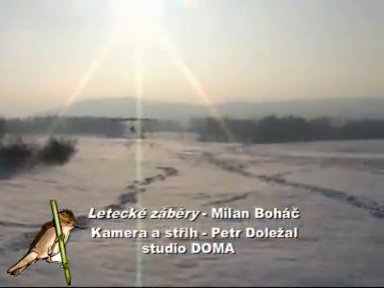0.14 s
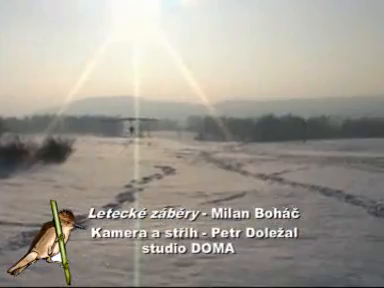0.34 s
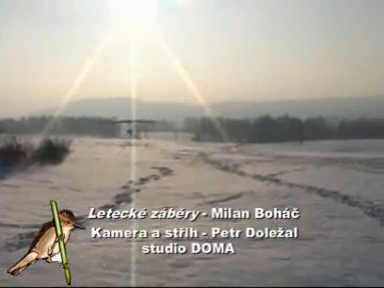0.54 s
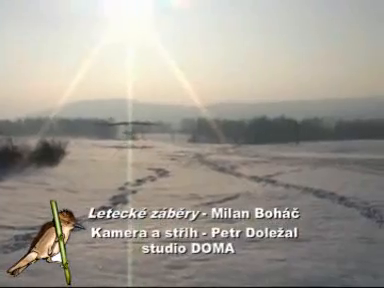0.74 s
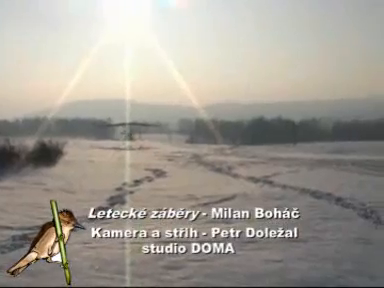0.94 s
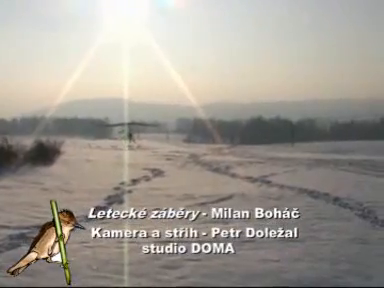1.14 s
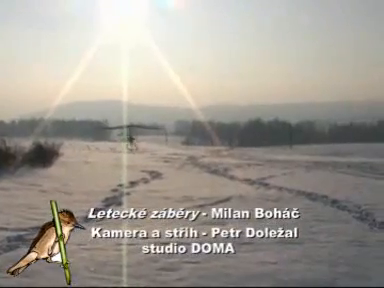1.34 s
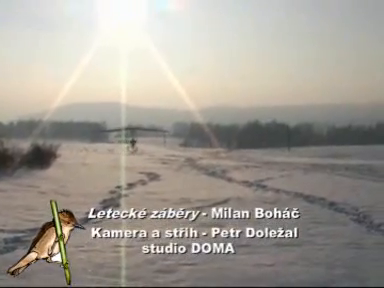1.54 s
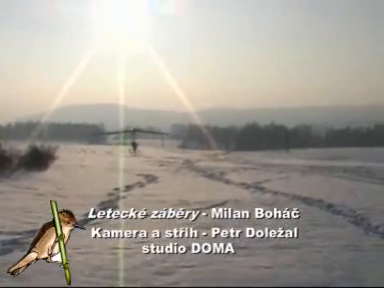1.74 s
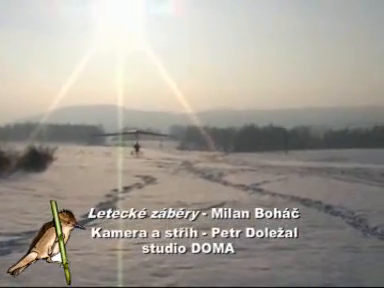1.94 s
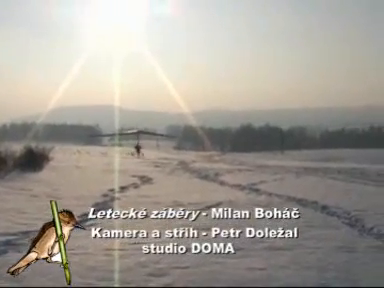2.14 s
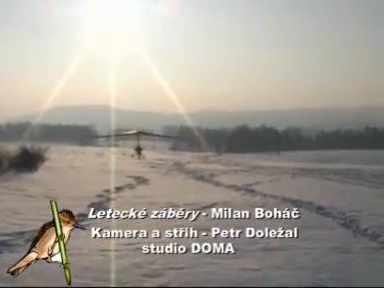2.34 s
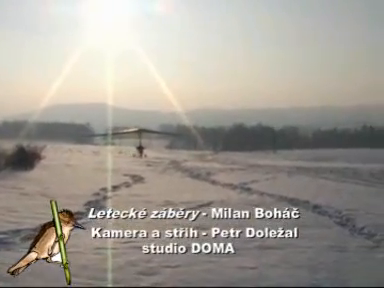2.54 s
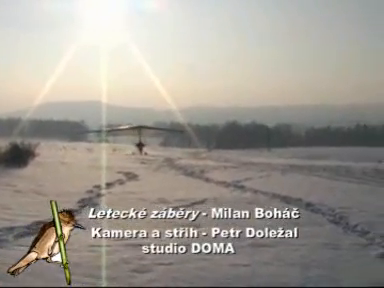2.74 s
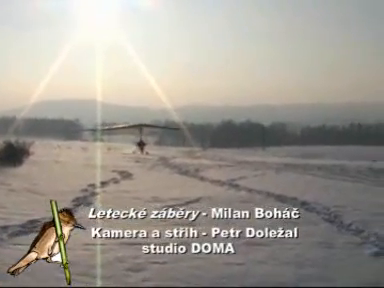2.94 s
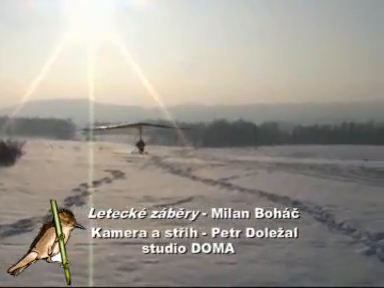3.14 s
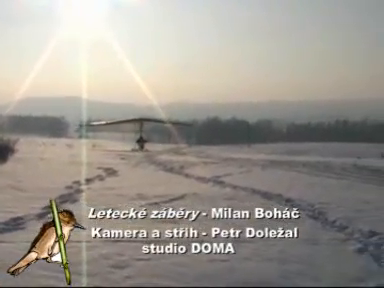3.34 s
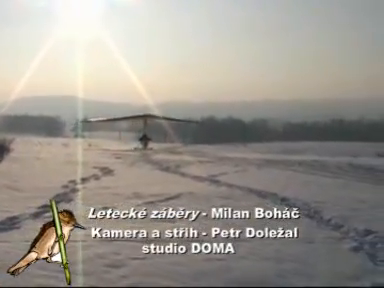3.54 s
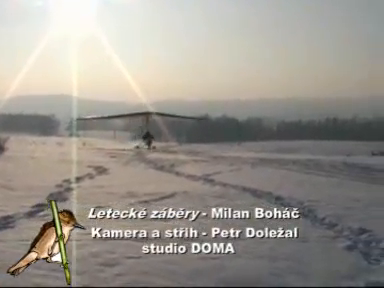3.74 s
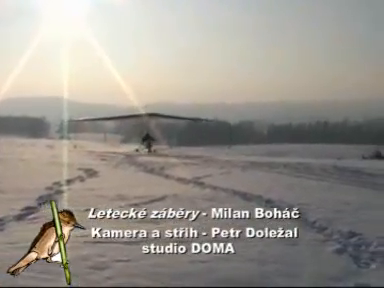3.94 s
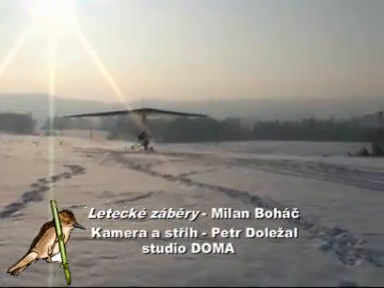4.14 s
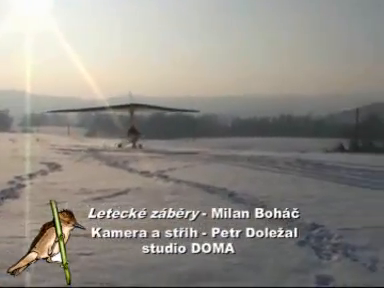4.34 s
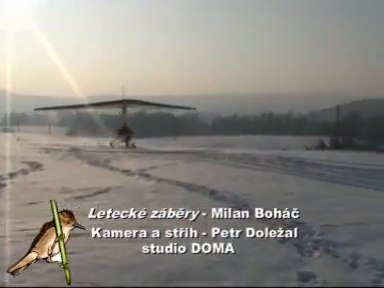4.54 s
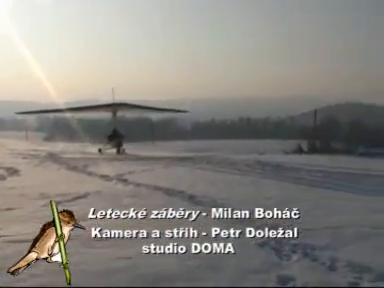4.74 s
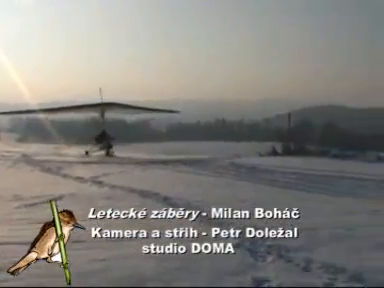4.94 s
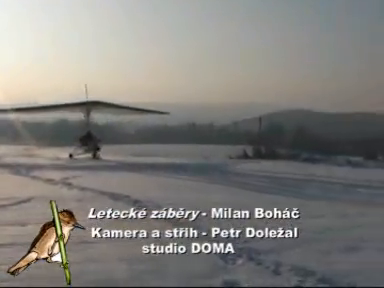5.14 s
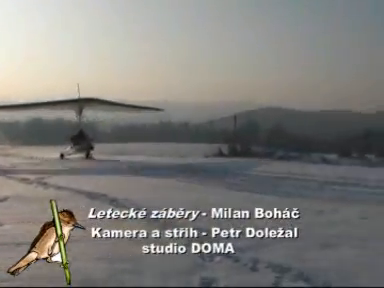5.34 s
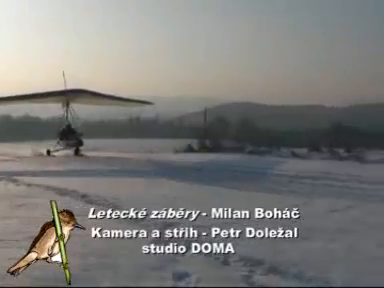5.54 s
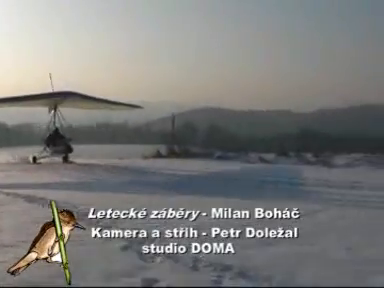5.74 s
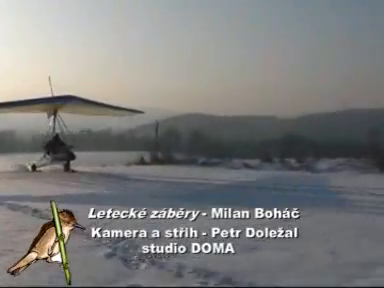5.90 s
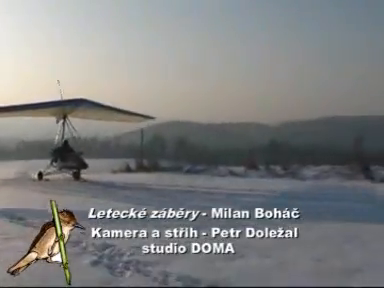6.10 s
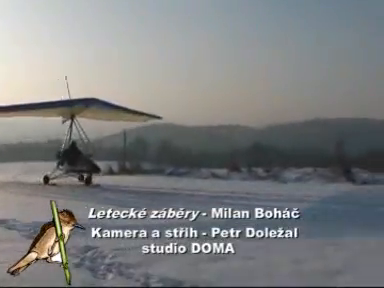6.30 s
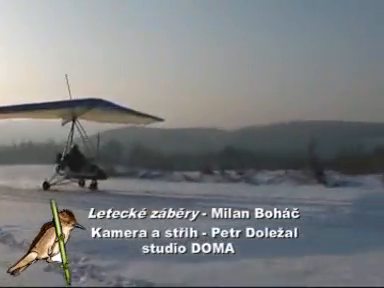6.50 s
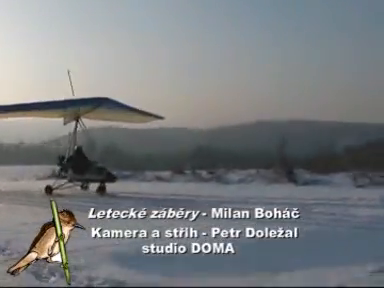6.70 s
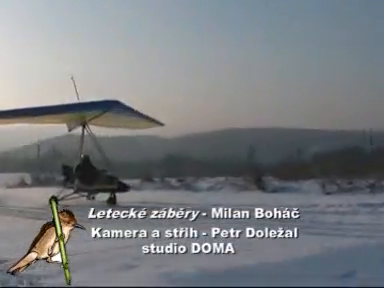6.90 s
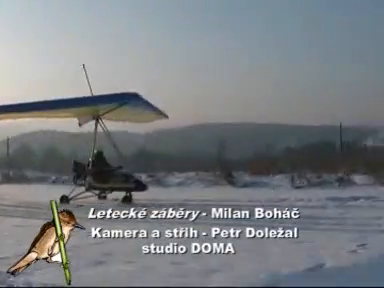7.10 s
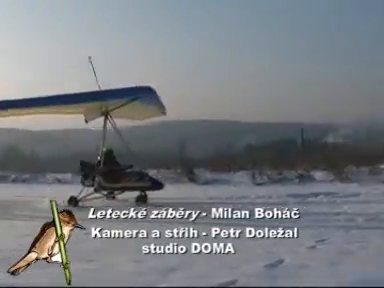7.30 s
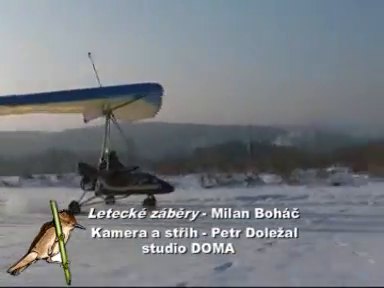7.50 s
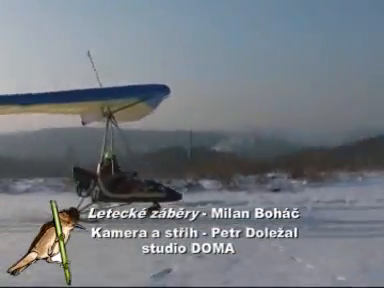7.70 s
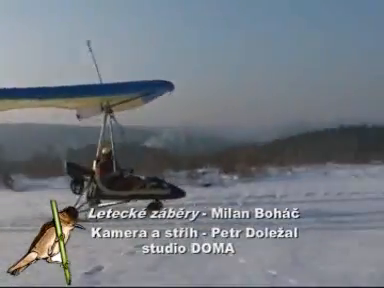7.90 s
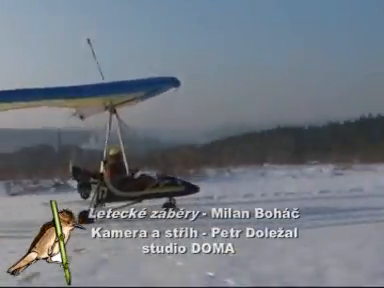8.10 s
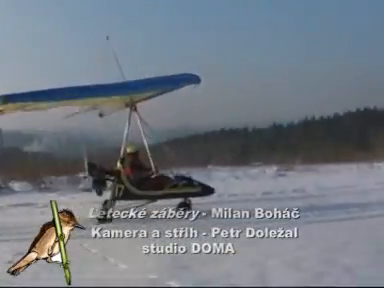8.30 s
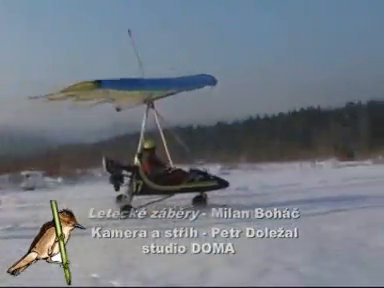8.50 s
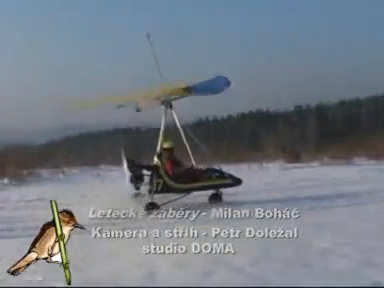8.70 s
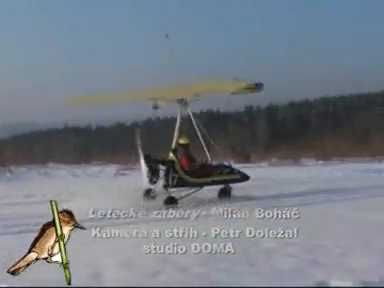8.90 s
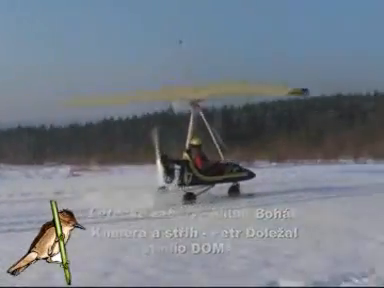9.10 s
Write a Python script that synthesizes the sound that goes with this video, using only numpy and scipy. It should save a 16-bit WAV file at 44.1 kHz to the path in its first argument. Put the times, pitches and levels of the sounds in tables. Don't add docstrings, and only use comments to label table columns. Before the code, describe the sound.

Faint engine putter and soft propeller chop sink in pitch while a light aircraft lands and rolls closer on snow. Low wheel rumble and short crunchy jolts precede a sudden throttle surge. The roar rises, hard blade slaps turn into a rapid buzz, and snowy air hisses as it taxis past. A breeze and faint camera hum lie beneath.

```python
import sys
import numpy as np
from scipy import signal
from scipy.fft import irfft
from scipy.io import wavfile
from scipy.ndimage import uniform_filter1d

SR = 44100
rng = np.random.default_rng(int(sys.argv[2]) if len(sys.argv) > 2 else 0)


def ratio_of_db(decibels):
    return 10 ** (np.asarray(decibels, float) / 20)


def to_wav(sig):
    pcm = np.clip(np.atleast_2d(sig), -1, 1) * 32767
    pcm = np.round(pcm).astype(np.int16)
    wavfile.write(sys.argv[1], SR, pcm.T)


N = 403515
T = np.arange(N) / SR

THROTTLE_S, TURN_S = 5.586, 6.8
BEHIND_S, ABEAM_S = 7.95, 8.51
FIRST_CUT_TURNS = .23


def evened(x):
    return x / np.sqrt(np.mean(x ** 2) + 1e-20)


def levelled(x):
    return x / np.sqrt(uniform_filter1d(x ** 2, size=12000) + 1e-9)


def curves(rows):
    s, *columns = np.transpose(rows)
    return [np.interp(T, s, c) for c in columns]


def ramp(start_s, length_s):
    return np.sin(np.pi / 2 * np.clip((T - start_s) / length_s, 0, 1)) ** 2


def bump(centre_s, width_s):
    return np.exp(-.5 * ((T - centre_s) / width_s) ** 2)


def drift(top_hz):
    b, a = signal.butter(1, top_hz / SR * 2)
    once = signal.lfilter(b, a, rng.standard_normal(N))
    return evened(signal.lfilter(b, a, once))


def colour(x, points, even=True):
    hz, db = np.transpose(points)
    full_hz = abs(np.fft.fftfreq(8192, 1 / SR))
    full_db = np.interp(np.log(full_hz + 1), np.log(hz + 1), db, left=-90, right=-90)
    log_gain = np.log(ratio_of_db(full_db))
    taps = np.fft.ifft(np.exp(np.conj(signal.hilbert(log_gain)))).real[:4096]
    if even:
        taps = taps / np.linalg.norm(taps)
    return signal.oaconvolve(x, taps)[:N]


# (time [s], blade passes [1/s])
SPEED = [(0.0, 52.66), (0.35, 49.08), (0.7, 46.31), (1.4, 43.55), (2.45, 42.11), (3.5, 40.52), (4.2, 39.21),
         (4.9, 38.08), (5.45, 37.24), (5.6, 38.61), (5.9, 49.36), (6.15, 56.24), (6.45, 61.56),
         (6.85, 65.68), (7.3, 68.67), (7.9, 71.72), (8.5, 73.38), (9.15, 74.18)]
# (time [s], distance [m])
DISTANCE = [
    (0, 142),
    (1.8, 99),
    (2.5, 114),
    (4, 48.6),
    (5.1, 30.3),
    (5.5, 24.3),
    (7, 14.9),
    (8.6, 12.6),
    (9.15, 14.7),
]


def flight():
    closest_m, idle_hz, full_hz = 12, 37.5, 74.2
    surge_s, surge_rise_s, surge_fall_s = 6.194, 0.41, 0.38
    surge = np.where(T < surge_s, bump(surge_s, surge_rise_s), np.exp(-((T - surge_s) / surge_fall_s)))
    return dict(
        loss_db=20 * np.log10(closest_m / curves(DISTANCE)[0]),
        speed=(curves(SPEED)[0] - idle_hz) / (full_hz - idle_hz),
        flare=np.exp(-T / 1),
        throttle=ramp(THROTTLE_S, 0.59),
        surge=surge * ramp(THROTTLE_S - .1, 0.21),
        abeam=bump(ABEAM_S, 0.39),
        behind=ramp(BEHIND_S, 0.23))


FLIGHT = flight()

# (level when closest [dB], share of distance loss [dB/dB], then gain at full
# speed, flare, throttle, surge, abeam, behind [dB])
LEVELS = dict(tone1=(-58, 1.7, 23.5, .1, 0.8, 8, 4, 1.3), tone2=(-40, 0.36, 1.5, -9, 0.45, 7.5, 8, 1.5),
          tone3=(-30, 1.95, -0.4, 6, -14, 10.5, 7.5, 2.5), firing=(-55, 0.5, -2, .1, 13, 5, 1.5, 0.5),
          pipe=(-46, 1.4, 0.37, 14, -5.5, 13, 0, 12.5), roar=(-29.5, 0.7359, 0.9, 12.5, 3, 7, -0.2, -0.35),
          slap=(-41.5, 0.85, 4.0, 11, 12.5, 1.6, -1.7, -1), hiss=(-30, 1.0133, -0.77, -2.5, -.5, 7.5, 5, 0))


def level(layer):
    base_db, *gains = LEVELS[layer]
    return base_db + np.dot(gains, list(FLIGHT.values()))


def tones(turns):
    third_db = level('tone3')
    levels_db = [level('tone1'), level('tone2'), third_db, np.minimum(third_db - 12, -57)]
    out = np.zeros(N)
    for k, db in enumerate(levels_db, 1):
        phase = 2 * np.pi * k * (turns - .5) + 0.064 * drift(24.0)
        out += np.sqrt(2) * ratio_of_db(db + 0.59 * drift(14.0)) * np.cos(phase)
    return out


def chop_share():
    return .25 + .18 * ramp(THROTTLE_S, 1.1) - .15 * bump(ABEAM_S - .15, .25)


def struts():
    head_on, side_on, closed = .3, .24, .095
    gap = side_on + (head_on - side_on) * np.exp(-np.maximum(T - TURN_S, 0) / .55)
    gap = np.maximum(gap - .22 * np.maximum(T - BEHIND_S - .1, 0), closed)
    first_db, turned_db, behind_db = 1.5, 5, 4.5
    turned, behind = ramp(TURN_S - .05, 0.11), ramp(BEHIND_S + .15, .2)
    return gap, first_db + (turned_db - first_db) * turned + (behind_db - turned_db) * behind


def gate(turns, place, width):
    return np.exp(-.5 * (((turns - place + .5) % 1 - .5) / width) ** 2)


def wake(turns):
    gap, second_db = struts()
    first = ratio_of_db(-second_db / 6) * gate(turns, FIRST_CUT_TURNS + .05, .05)
    second = ratio_of_db(second_db / 6) * gate(turns, FIRST_CUT_TURNS + gap + .02, .04)
    return first + second + .55 * gate(turns, FIRST_CUT_TURNS + gap / 2 + .05, .09)


# (frequency [Hz], density [dB/Hz])
DULL_ROAR = [(150, -18), (250, -14.5), (380, -2.5), (520, -2), (620, -3), (1000, 1), (1500, -2.5),
             (2100, -8), (2800, -14), (4000, -28.5), (6000, -60)]
SHARP_ROAR = [(150, -27), (250, -4.5), (330, -14), (470, -0.5), (620, -10.5), (1070, -1), (1350, 0),
              (1700, 1.5), (2200, -1.5), (3000, -14), (5000, -15)]
POWER_ROAR = [(200, -21), (300, -21.5), (400, -9.5), (520, -8), (700, -5), (1000, -0.5), (1400, -2.5),
              (1900, -4.5), (2500, -9), (3300, -20), (5000, -23)]


def roar(turns):
    chop = np.clip(chop_share(), 0, 1)
    dull = np.clip(0.5 + 0.5 * FLIGHT['flare'], 0, 1)
    power = ramp(THROTTLE_S, 0.98)
    burst = evened(wake(turns) * ratio_of_db(.6 * drift(40.0)))
    churn = ratio_of_db(0.73 * drift(26.0))
    drive = (chop * burst + (1 - chop) * churn) * rng.standard_normal(N)
    idle = dull * colour(drive, DULL_ROAR) + (1 - dull) * colour(drive, SHARP_ROAR)
    return ratio_of_db(level('roar')) * levelled((1 - power) * idle + power * colour(drive, POWER_ROAR))


def clicks(turns, jitter_s, spread_db):
    passes = np.arange(1, int(turns[-1]))
    chance = rng.standard_normal((len(passes), 2))
    at = np.interp(passes, turns, np.arange(N)) + jitter_s * SR * chance[:, 0]
    size = ratio_of_db(spread_db * chance[:, 1])
    out = np.zeros(N + 2)
    out[at.astype(int)] += size * (1 - at % 1)
    out[at.astype(int) + 1] += size * (at % 1)
    return out[:N]


def chirped(x, late_s):
    phase = 2 * np.pi * np.cumsum(late_s) * SR / 1024
    return signal.oaconvolve(x, irfft(np.exp(-1j * phase))[:512])[:N]


# (frequency [Hz], level [dB])
SOFT_SLAP = [(250, -40), (390, -20), (450, -7), (540, 0), (650, -2), (800, -5), (1000, -7), (1500, -10),
             (2500, -19), (4000, -35)]
HARD_SLAP = [(250, -36), (320, -22), (370, -13), (600, -9), (800, -2), (1000, 0), (1300, -1), (1650, -2),
             (2100, -7), (3000, -15), (5000, -28)]


def slaps(turns):
    flip_s, flipping_s = 8.05, .35
    level_db = level('slap') - 3.5 * bump(flip_s + flipping_s / 2, flipping_s / 3)
    gap, second_db = struts()
    soft = np.exp(-np.maximum(T - 6.05, 0) / .45) + .4 * ramp(BEHIND_S + .15, .2)
    first = clicks(turns - FIRST_CUT_TURNS, .00004, 1.0)
    second = ratio_of_db(second_db) * clicks(turns - FIRST_CUT_TURNS - gap, .00004, 1.0)
    second *= 1 - 2 * ramp(flip_s, flipping_s)
    hz = np.fft.rfftfreq(1024, 1 / SR)
    late_s = .0003 + .002 * np.clip(1 - hz / 1600, 0, 1)
    drive = chirped(first, late_s) + np.roll(chirped(second, .0026 - late_s), -round(.002 * SR))
    slap = soft * colour(drive, SOFT_SLAP) + (1 - soft) * colour(drive, HARD_SLAP)
    return -ratio_of_db(level_db + 1.5) * levelled(slap)


def engine(turns):
    firings_per_pass = 1.655
    firing_db, pipe_db = level('firing'), level('pipe')
    honk_db = 16.0 * np.exp(-((T - 5.58) / .42) ** 2)
    levels_db = [firing_db + 1 + honk_db / 3, firing_db - 9 + 1.1 * honk_db, firing_db - 7 + .9 * honk_db,
                 pipe_db - honk_db / 4, pipe_db - 5 - honk_db / 4]
    out = np.zeros(N)
    for k, db in enumerate(levels_db, 1):
        phase = 2 * np.pi * k * firings_per_pass * turns + .2 * drift(6.0)
        out += np.sqrt(2) * ratio_of_db(db + 1.5 * drift(6.0)) * np.cos(phase)
    return out


# (frequency [Hz], density [dB/Hz])
FAR_HISS = [(1200, -30), (2200, -7), (3000, -1.5), (3700, -6), (4600, -7.5), (5400, -5), (7080, -9.5),
            (9000, -13.5), (11500, -23), (14000, -32)]
NEAR_HISS = [(1200, -41), (2200, -4.5), (2900, -3.5), (4640, -7), (6030, -4), (7280, -9), (8530, -7),
             (10300, -11.5), (12000, -17.5), (14000, -13)]
# (time [s], gain [dB], half length [s])
PUFFS = [
    (2.24, 2.5, .15),
    (5.254, 0, 0.025),
    (6.24, 1.5, 0.089),
    (6.87, 3, 0.073),
    (7.466, 1.5, 0.039),
    (7.96, 1, 0.075),
    (8.208, 1, 0.032),
    (9.09, 2.5, 0.05),
]


def hiss(turns):
    level_db = level('hiss') + sum(db * bump(s, width_s) for s, db, width_s in PUFFS)
    near = np.clip((level_db + 47.5) / 18, 0, 1)
    chopped = 1 + 1.11 * chop_share() * wake(turns)
    flutter_db = 0.51 * drift(32.0) + 0.76 * drift(65.0)
    air = evened(chopped * ratio_of_db(flutter_db) * rng.standard_normal(N))
    return ratio_of_db(level_db) * ((1 - near) * colour(air, FAR_HISS) + near * colour(air, NEAR_HISS))


# (time [s], jolt [dB])
CRUST_BREAKS = [
    (4.886, 3),
    (4.982, 3),
    (5.113, 3),
    (5.205, 3),
    (5.302, 4),
    (5.464, 3),
]


def crunch():
    s, db = np.transpose(CRUST_BREAKS)
    jolts_db = np.zeros(N)
    jolts_db[(s * SR).astype(int)] = db
    bell = np.exp(-.5 * (np.arange(-1000, 1001) / SR / 0.0041) ** 2)
    return ratio_of_db(signal.oaconvolve(jolts_db, bell, "same"))


# (frequency [Hz], density [dB/Hz])
TYRES = [(20, -43), (45, -42), (80, -0.5), (120, 3.5), (170, 3), (220, -4), (300, -33), (400, -38)]
# (frequency [Hz], level [dB])
SOFT_SNOW = [(20, 0), (140, 1), (210, -10), (400, -14)]
# (time [s], level [dB])
WHEELS = [
    (0, -64.5),
    (2.6, -59.5),
    (3.4, -47),
    (4.3, -41.5),
    (5.5, -40),
    (5.96, -36),
    (6.55, -47),
    (8.2, -50),
    (9.15, -47),
]


def rumble():
    lumps = ratio_of_db(.8 * drift(10.0)) * rng.standard_normal(N)
    wheels = evened(colour(lumps, TYRES))
    near = ramp(4.15, 0.38)
    heard = near * wheels + (1 - near) * colour(wheels, SOFT_SNOW, even=False)
    return ratio_of_db(curves(WHEELS)[0]) * heard


# (frequency [Hz], density [dB/Hz])
WIND = [(15, -20), (30, -11), (50, 1), (70, 8), (110, -18), (200, -40)]


def breeze():
    return ratio_of_db(-58 + 2.0 * drift(1.5)) * evened(colour(rng.standard_normal(N), WIND))


# (frequency [Hz], level [dB])
MOTOR = [(150, -66)]


def hum():
    return sum(np.sqrt(2) * ratio_of_db(db) * np.sin(2 * np.pi * hz * T) for hz, db in MOTOR)


# (frequency [Hz], side minus mid [dB])
LOW_SIDE = [(20, -11), (150, -44), (300, -26.5), (700, -18.5), (1250, -23.5), (1900, -34), (3200, -34.5),
            (6000, -36)]
TOP_SIDE = [(6000, -60), (7500, -24), (8500, -14.5), (11700, -6.5), (12300, -30), (14000, -40)]
# (opens [s], rise [s], closes [s], fall [s])
WIDE_SPELLS = [
    (4.3, 1.4, 5.95, .3),
    (6.35, .25, 8.1, .3),
]


def width(mid, blades):
    scatter = rng.standard_normal(1300) * ratio_of_db(-60 * np.arange(1300) / SR / .04)
    scattered = signal.oaconvolve(mid, scatter / np.linalg.norm(scatter))[:N]
    low_db = -2 - .25 * FLIGHT['loss_db'] - 3 * FLIGHT['behind']
    is_open = sum(ramp(a, rise) - ramp(b, fall) for a, rise, b, fall in WIDE_SPELLS)
    top_db = -21 * (1 - is_open)
    side = ratio_of_db(low_db + 2.0 * drift(12.0)) * colour(scattered, LOW_SIDE, even=False)
    side += ratio_of_db(top_db + 4.3 * drift(11.0)) * colour(scattered, TOP_SIDE, even=False)
    lean_db = .75 * bump(7.1, .9) - .1
    return side + blades * (ratio_of_db(lean_db / 2) - 1)


def scene():
    turns = .18 + np.cumsum(curves(SPEED)[0]) / SR
    heard = turns + .045 * np.maximum(T - TURN_S, 0)
    jolt = crunch()
    blades = roar(heard) * jolt + slaps(heard)
    mid = tones(turns) + blades + engine(turns) + hiss(heard) * jolt + rumble() + breeze() + hum()
    side = width(mid, blades)
    return np.array([mid + side, mid - side])


def top_cut(x):
    return signal.sosfilt(signal.butter(12, 13480, fs=SR, output="sos"), x)


def record(dry):
    hz, t, z = signal.stft(dry, SR, nperseg=1024)
    edge_hz = 13250 + 65 * FLIGHT['loss_db'] - 750 * FLIGHT['flare'] + 300 * FLIGHT['behind']
    top_hz = np.interp(t, T, edge_hz - 1050 * ramp(THROTTLE_S, .7))
    patches = np.kron(rng.standard_normal((103, 200)), np.ones((5, 4)))[:len(hz), :len(t)]
    slow = np.repeat(rng.standard_normal(200), 4)[:len(t)]
    spikes = np.maximum(rng.standard_normal(len(t)) + slow - 1.2, 0) * (t > 6.25)
    kept = hz[:, None] < top_hz + 400 * patches + 1000 * spikes
    mix = signal.istft(z * kept, SR, nperseg=1024)[1][:, :N]
    return top_cut(mix)


dry = scene()
out = record(dry)
to_wav(out)
```